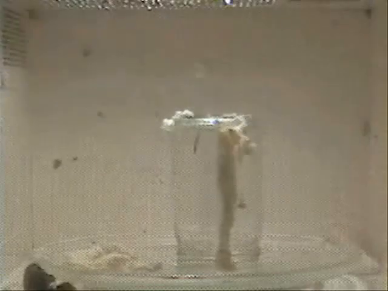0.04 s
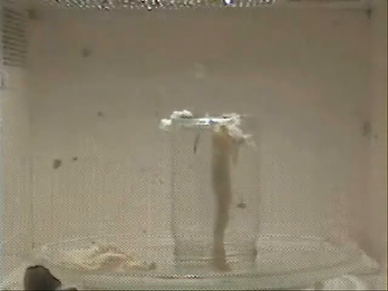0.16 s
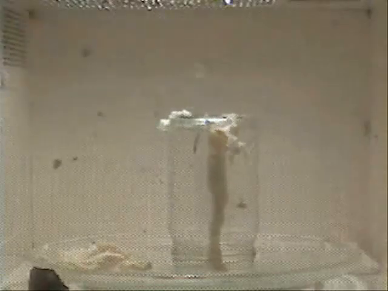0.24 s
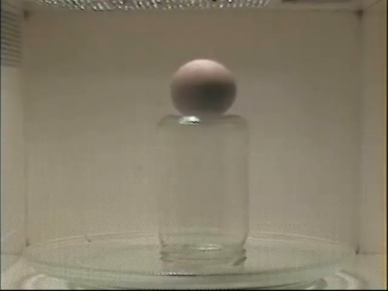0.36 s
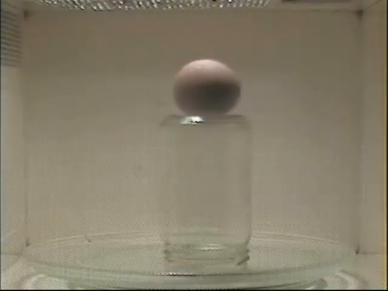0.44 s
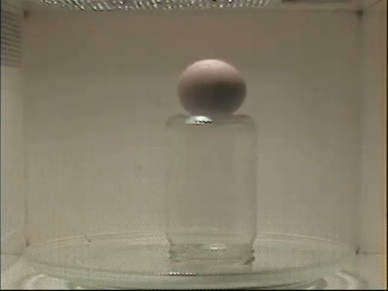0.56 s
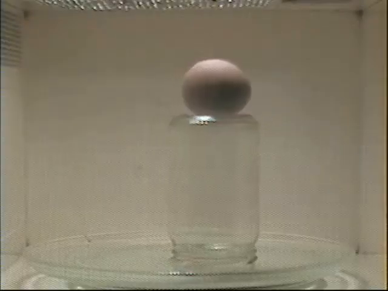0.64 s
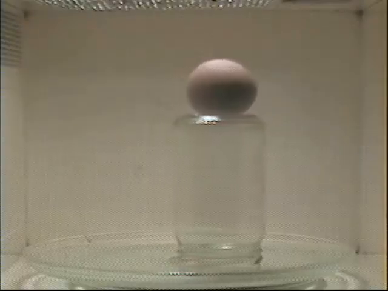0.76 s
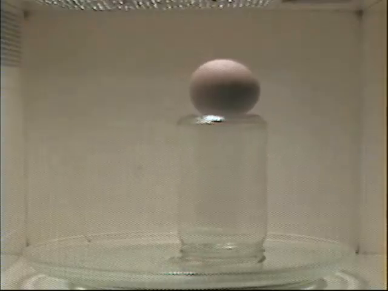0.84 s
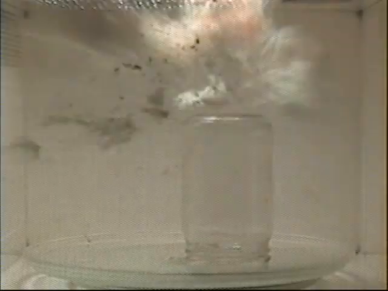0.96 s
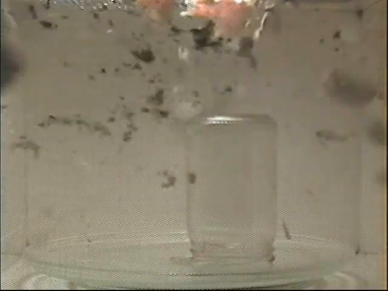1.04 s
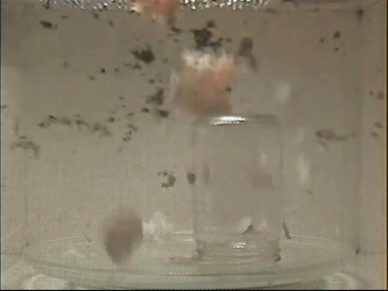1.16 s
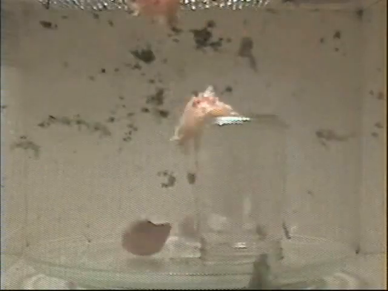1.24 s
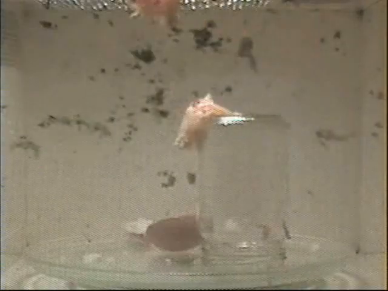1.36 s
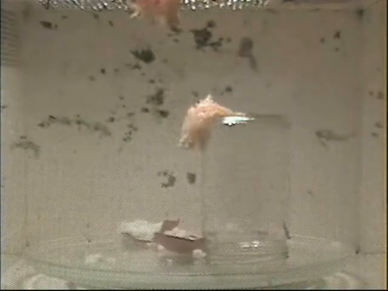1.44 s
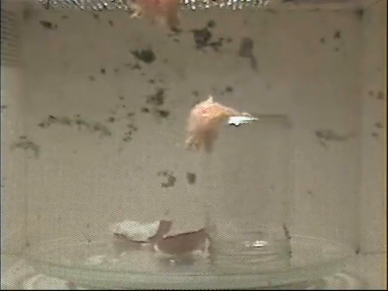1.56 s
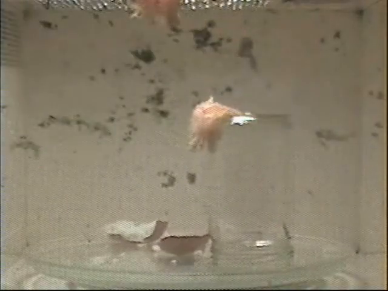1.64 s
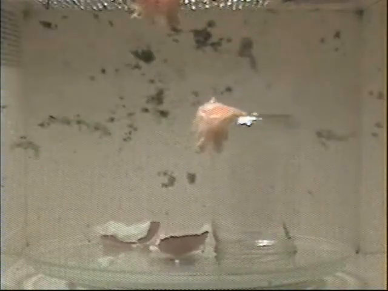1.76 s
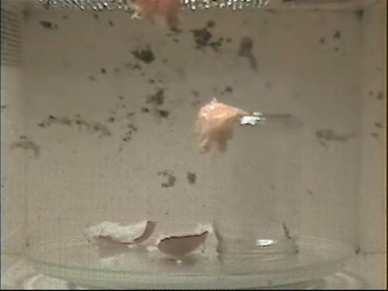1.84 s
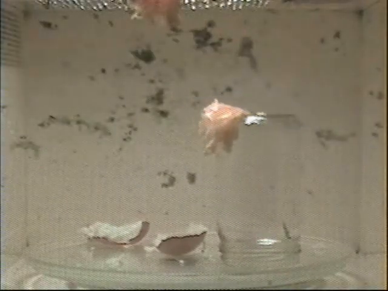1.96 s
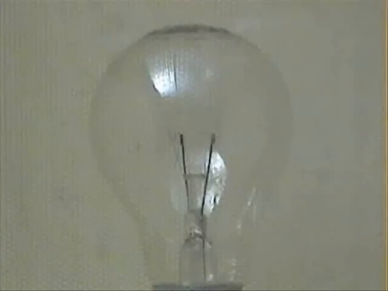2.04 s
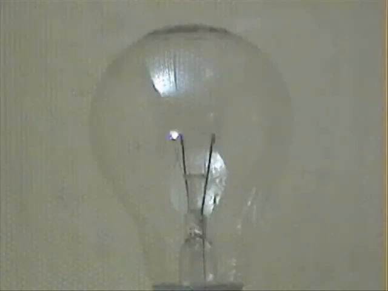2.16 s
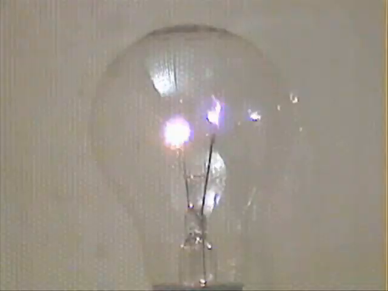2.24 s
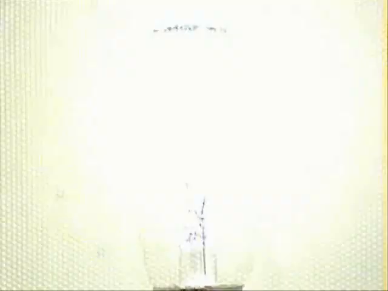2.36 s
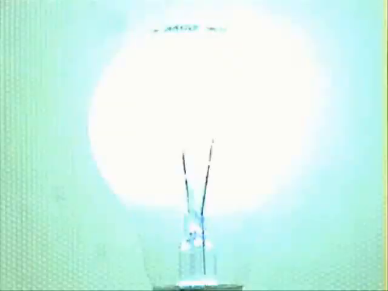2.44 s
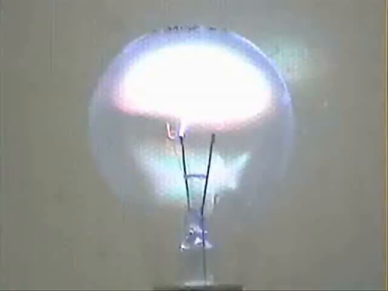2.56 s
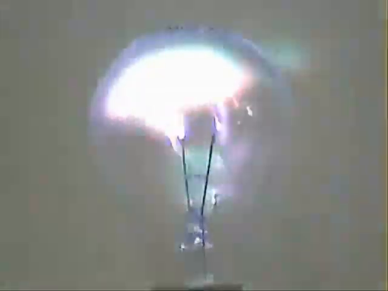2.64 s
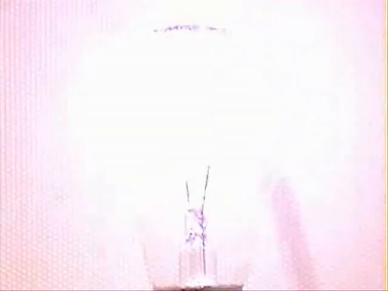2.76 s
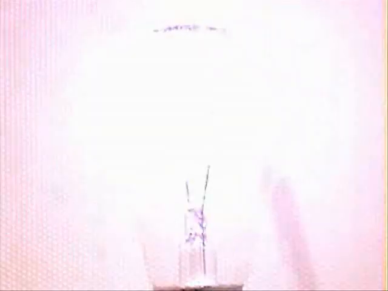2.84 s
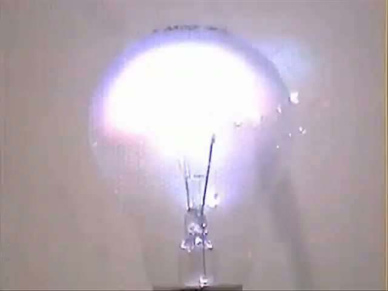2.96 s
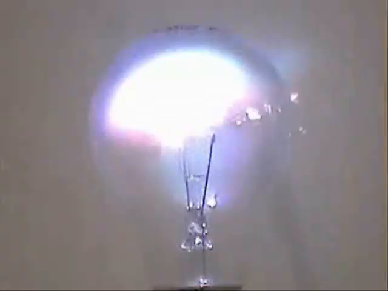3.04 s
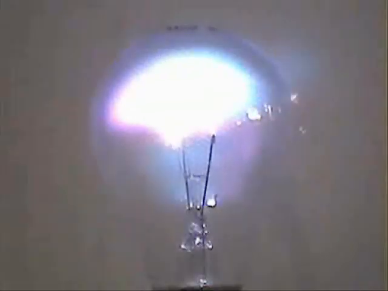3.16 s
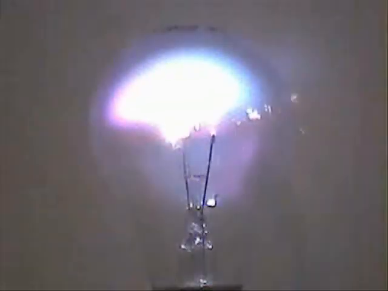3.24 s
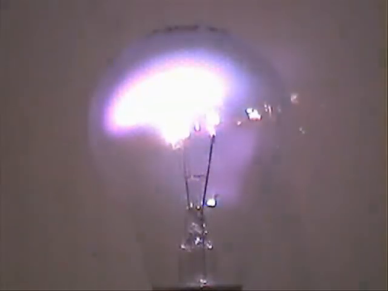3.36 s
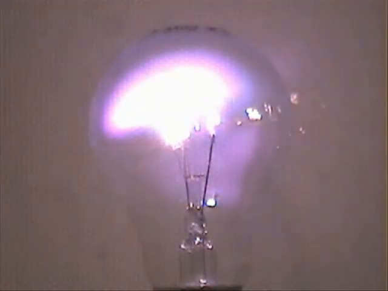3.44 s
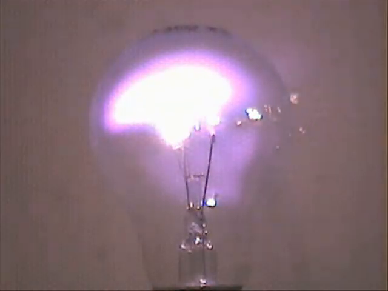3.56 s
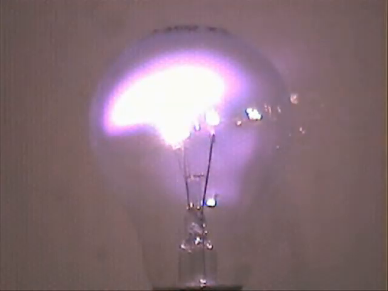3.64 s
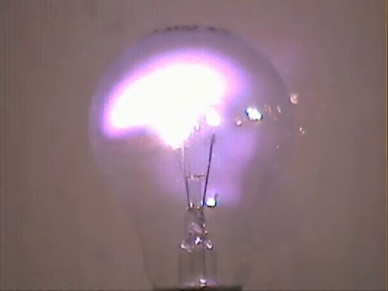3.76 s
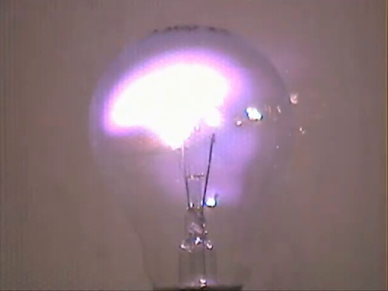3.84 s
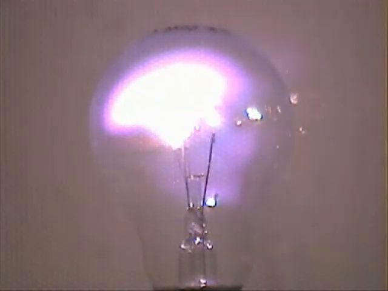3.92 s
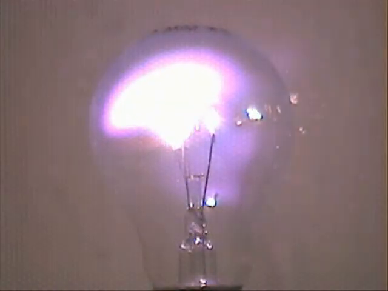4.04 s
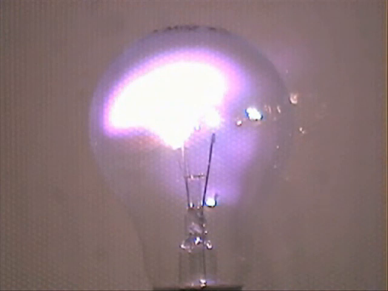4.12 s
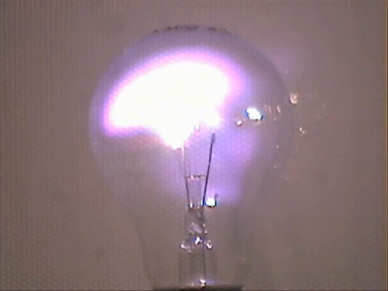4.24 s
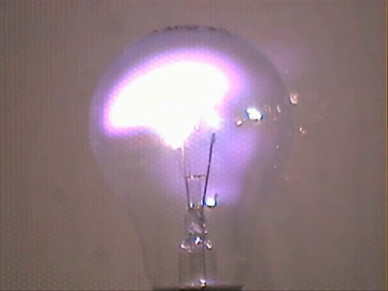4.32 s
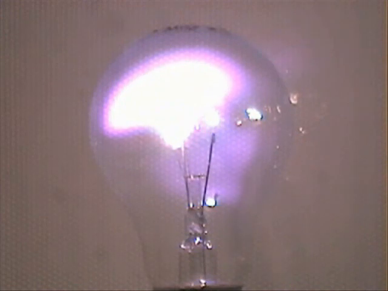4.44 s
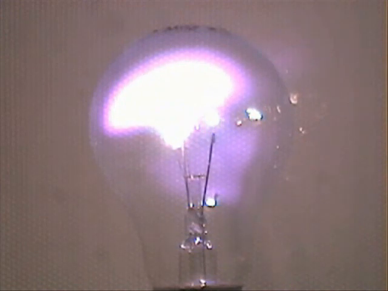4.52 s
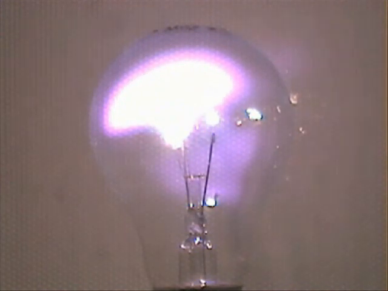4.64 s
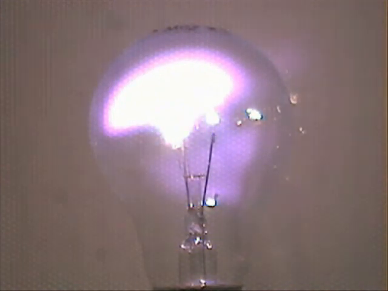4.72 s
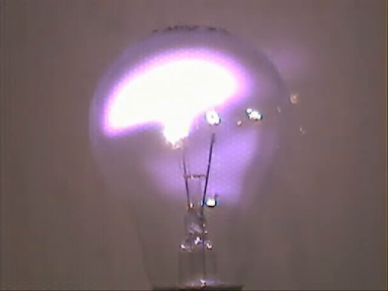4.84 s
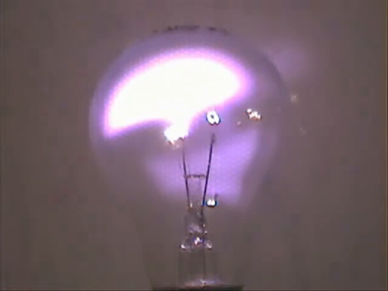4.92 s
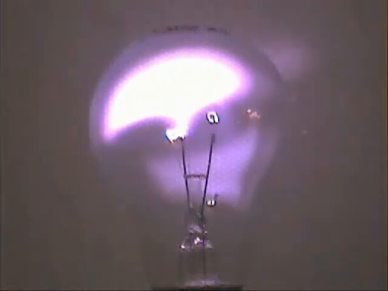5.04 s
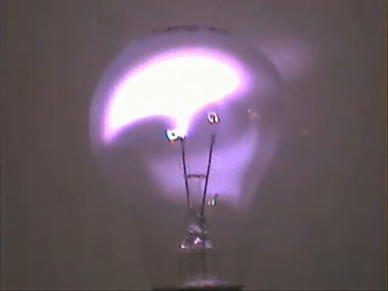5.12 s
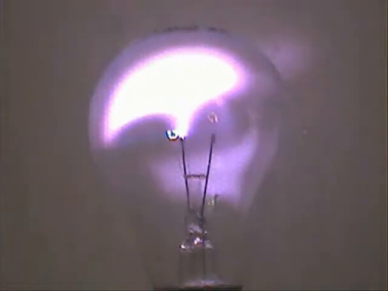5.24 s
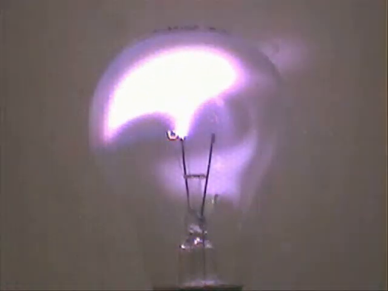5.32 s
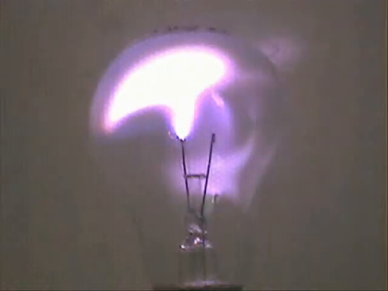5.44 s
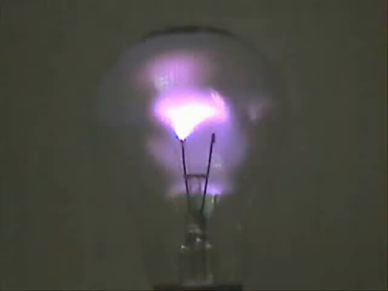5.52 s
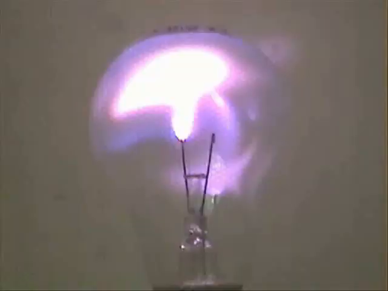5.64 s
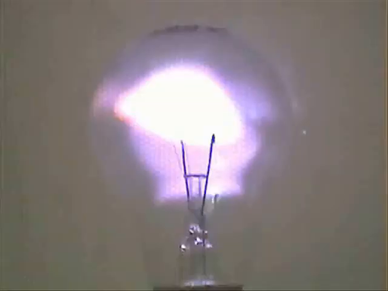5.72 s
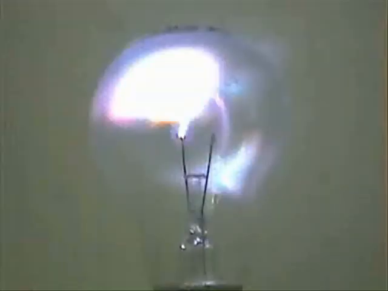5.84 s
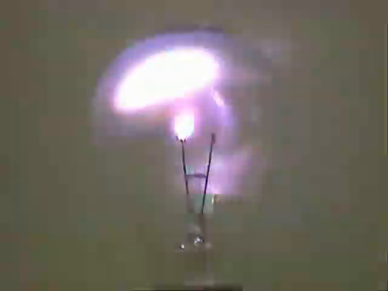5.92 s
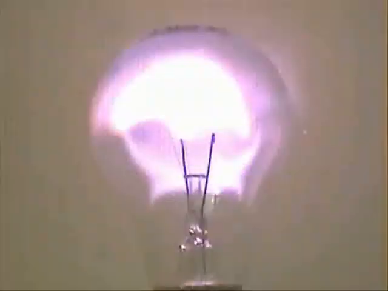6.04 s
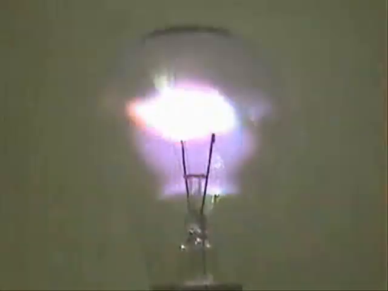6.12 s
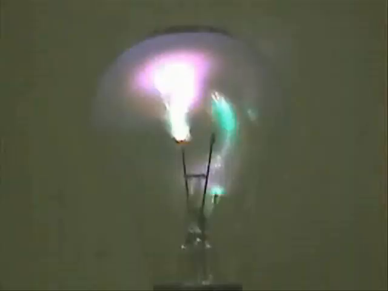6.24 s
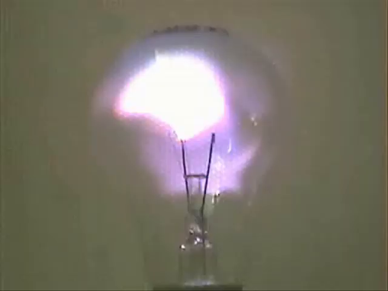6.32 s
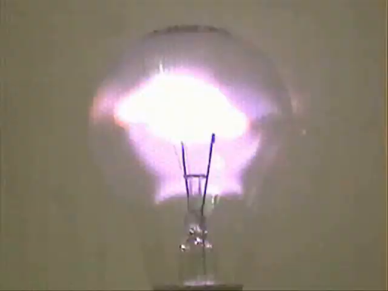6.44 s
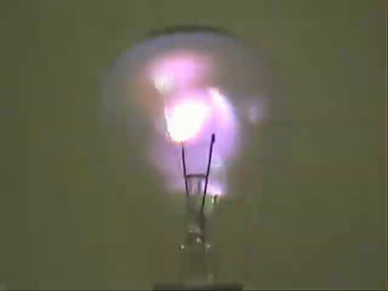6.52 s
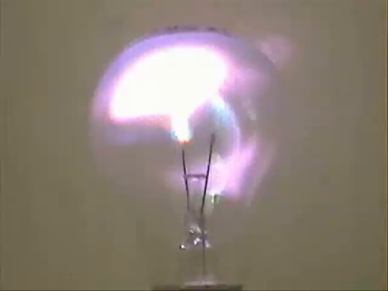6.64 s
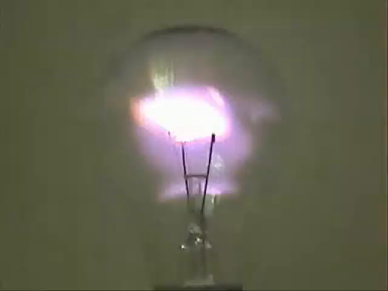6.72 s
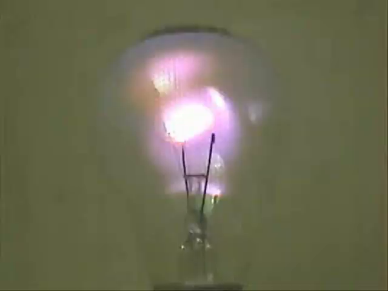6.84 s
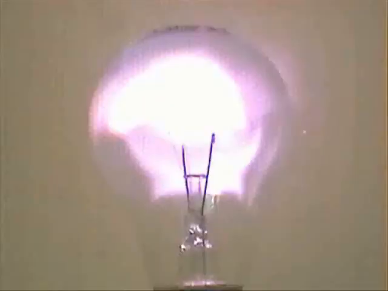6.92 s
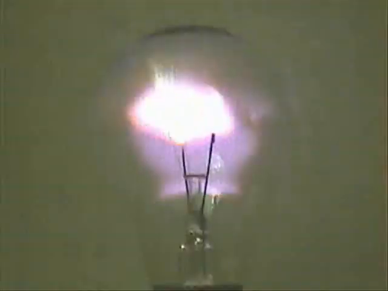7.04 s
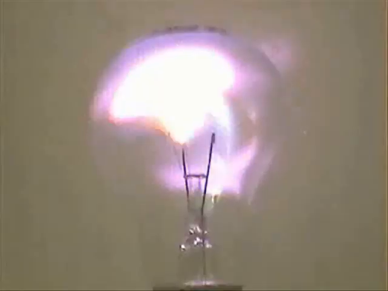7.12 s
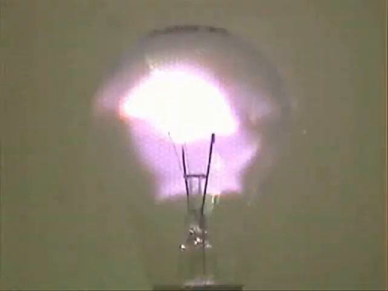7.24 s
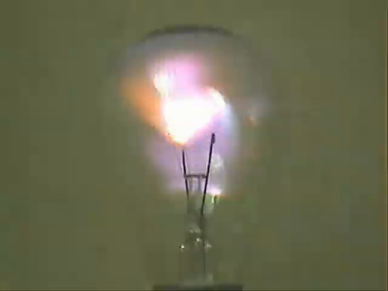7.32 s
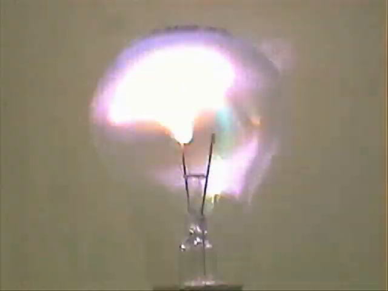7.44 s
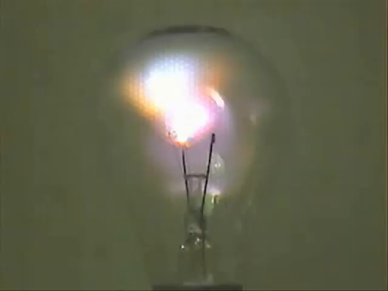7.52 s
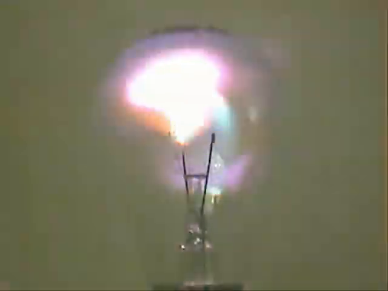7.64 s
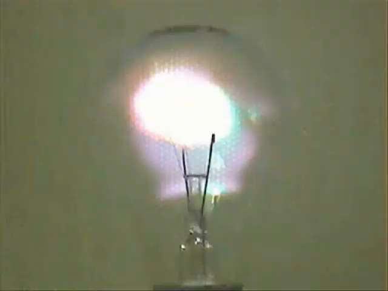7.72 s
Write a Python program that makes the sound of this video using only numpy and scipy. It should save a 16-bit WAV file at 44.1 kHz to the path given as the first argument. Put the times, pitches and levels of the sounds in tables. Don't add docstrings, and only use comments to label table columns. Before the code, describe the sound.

Wet egg spatter and hiss, a near-silent wait, a violent egg burst with shell clinks, then a steady microwave hum with faint fizzing arc tones.

```python
import sys
import numpy as np
from scipy import signal
from scipy.fft import rfft, irfft, next_fast_len
from scipy.io import wavfile
from scipy.ndimage import uniform_filter1d

SR = 44100
rng = np.random.default_rng(int(sys.argv[2]) if len(sys.argv) > 2 else 0)


def ratio(d):
    e = np.asarray(d, float) / 20
    return 10 ** e


def log_audio(samples):
    frames = np.atleast_2d(samples).T
    limited = np.clip(frames, -1, 1)
    pcm = np.round(limited * 32767).astype(np.int16)
    wavfile.write(sys.argv[1], SR, pcm)


N = 343098
T = np.arange(N) / SR

# start in seconds, stop in seconds, level left in the gap after it in dB.
MOMENTS = [
    (0, .4022, -86),
    (.4400, 2.1080, -92),
    (2.1602, 8, -92),
]
FIRST_STOP_S, CLOSE_UP_S = MOMENTS[0][1], MOMENTS[2][0]

# frequency in Hz, level in dB per Hz.
HISS = [(20, -12), (50, -2.5), (140, -3), (250, -6), (700, -11.5), (2000, -14), (5000, -19), (10000, -17.5),
        (15000, -20)]
HISS_DB = -61.5
# frequency in Hz, level in dB.
FAR_HUM = [(48.4, -75.5), (145.3, -72), (183.0, -77), (360.7, -74.5), (532.9, -84.5), (716.0, -79)]

# peak in seconds, rise in seconds, 60 dB decay in seconds, hiss in dB,
# splash in dB over the hiss.
GUSHES = [
    (.086, .3, 0.52, -41, 6),
    (.24, .05, 0.54, -47, -1),
    (.36, 1.1, 2.3, -53.5, -4),
    (1.128, .046, 0.1, -23.5, -5),
    (1.151, .02, 0.41, -32, 2.5),
    (1.312, .22, 0.89, -47, -0.3),
]
RISE_DB, SPLASH_RISE, SPLASH_FALL = 20, 1.6, 1.13
# peak in seconds, rise in seconds, 60 dB decay in seconds,
# level in dB, frequency in Hz.
BOOMS = [
    (.046, .05, .8, -39.5, 120),
    (.06, .016, 0.096, -29.5, 310),
    (.3, 1.1, 2.6, -55, 300),
    (1.135, .012, .12, -23.5, 255),
    (1.165, .03, 0.52, -36.5, 240),
    (1.155, .03, 0.49, -36.5, 720),
    (1.375, .05, .18, -49, 135),
    (1.402, 0.0066, 0.094, -39, 45.4),
]
DRONE_HZ, DRONE_DB = 102, -51.5

# start in seconds, level in dB, dull part in dB over it, bright centre in Hz.
YOLK = [(0.0034, -31.5, -5, 7400), (0.0368, -28.5, -19, 11600), (0.0452, -32, -4, 6600),
        (0.0676, -32, 3.5, 9200), (0.076, -26.5, -14, 9400), (0.0994, -35, 4.5, 5270),
        (0.124, -39, 1, 4990), (0.197, -42, 7.5, 5230), (0.2124, -38, -10, 6970),
        (0.2362, -20.5, -12, 7340), (0.334, -43, -1, 8940), (0.3476, -37, -15, 7560),
        (0.36, -42, -11, 8690)]
# start in seconds, level in dB, dull part in dB over it,
# bright centre in Hz.
SHELL = [(0.93, -47, -12, 14000), (1.089, -42, 2, 8970), (1.1271, -16, -0.5, 9500),
         (1.1314, -23, -10, 5470), (1.1481, -22, -8, 4670), (1.1794, -26.5, -8, 7500),
         (1.2084, -36, -3, 4610), (1.2438, -49, 6, 5850), (1.294, -50, -19, 10000),
         (1.3263, -40, -3, 11100), (1.3444, -42, 3, 9510), (1.4516, -34.5, -23, 10600),
         (1.483, -45, -20, 12900), (1.5235, -48, -6.5, 7870), (1.5364, -54, -8, 9690),
         (1.5953, -57, -9, 7320), (1.7769, -59, -8.5, 10800), (1.8463, -48, -15, 9060),
         (1.95, -57, -10, 8850)]
TICK_RISE_S, YOLK_T60_S, SHELL_T60_S = .001, 0.047, 0.074

# start in seconds, peak in dB, contact in seconds, decay time factor.
BLOWS = [
    (.048, -33, 0.00045, 1.0),
    (0.2367, -15.5, 0.00023, 0.71),
    (.932, -48.5, 0.00017, 0.58),
    (1.121, -19, 0.00038, 0.8),
    (1.1252, -9, 0.00029, 0.9),
    (1.3990, -17, 0.00027, 0.23),
    (1.524, -41, 0.00041, 0.18),
]
# frequency in Hz, level in dB, 60 dB decay in seconds.
WALLS = [(75, -8.5, 0.041), (136, -10, 0.23), (180, -10.5, 0.11), (255, -2.5, 0.11), (286.6, -6.5, 0.16),
         (393, -14, 0.038), (517, -8.5, 0.05), (637, -5, 0.067), (690, 10.5, 0.033), (748, -6.5, 0.23),
         (1090, -3.5, .04), (2490, -10, .015)]
# start in seconds, level in dB.
CLINKS = [
    (.944, -58),
    (1.297, -46),
    (1.335, -41),
    (1.348, -44),
    (1.396, -44),
    (1.405, -53),
    (1.434, -52),
    (1.481, -47),
    (1.597, -61),
]
# frequency in Hz, level in dB, 60 dB decay in seconds.
GLASS = [(3290, -11.5, 0.12), (3950, -6, 0.065), (5150, -12, .06), (6370, -21, .1), (7370, -1, 0.05),
         (8360, -8, .07), (9510, -6, 0.11), (10600, -2, .03), (11900, -12, .08), (12600, -9, .06)]
# time in seconds, peak in dB, width in seconds.
POP = (1.1248, .5, .00009)

# time in seconds, frequency in Hz.
BLADE_HZ = [(2.16, 179.55), (4.5, 179.72), (6, 179.88), (7.8, 179.95)]
# multiple, level in dB.
BLADES = [(1, -33), (2, -32), (3, -56.5), (4, -58.5)]
MAINS_HZ = 100.07
# multiple of MAINS_HZ, level in dB.
CORE = [(2, -35.5), (3, -34)]
# time in seconds, level in dB.
LOAD = [(2.16, -16), (2.45, -16), (2.6, 0)]
# frequency in Hz, level in dB per Hz.
AIR = [(20, -33), (60, -27.5), (120, -25), (200, -20), (400, -18.5), (650, -32), (1300, -34.5), (2200, -43),
       (3500, -41.5), (4500, -47), (6000, -51.5), (8000, -57.5), (11000, -62.5), (15000, -70)]
AIR_DB = -31
# frequency in Hz, width in Hz, level in dB over the air.
CABINET = [(137.6, 28, 4.1), (186.7, 34, 12.3), (239.8, 34.4, 11.3), (289.2, 32, 15.6), (332.3, 17, 12),
           (368.3, 37, 9.3), (426, 35.6, 4), (505.5, 11, 5), (552, 30, 5.1), (581, 58, 3.5), (706, 52, 2.3),
           (810, 45, 3), (1113, 77, 5.5), (1510, 270, 4.2), (1722.6, 185, 21.1), (2493, 200, 6.1),
           (2870, 410, 2.3), (3323, 38, 6), (3826, 120, 6.4), (4148, 130, 10.2), (4950, 330, 5),
           (5535, 250, 8.3), (6440, 200, 5.8), (7780, 190, 1.3)]

# frequency in Hz, width in Hz, level in dB, 1 if only a wild arc rings it.
BULB = [(2880, 110, 2, 0), (8810, 260, -9, 0), (13850, 200, -21.5, 0), (2650, 120, -10, 1),
        (3880, 110, -6, 1), (4520, 130, -9, 1), (5350, 120, -9, 1), (6500, 300, -17, 1),
        (8200, 400, -18, 1), (9600, 250, -15, 1), (11400, 250, -19, 1), (12100, 300, -19, 1),
        (12900, 300, -21, 1), (4500, 3000, -12, 1)]
# peak in seconds, length in seconds, level in dB, heat as a pitch ratio,
# wildness in dB.
FLARES = [
    (2.39, .1, -70, .94, 13),
    (2.595, .08, -48, .95, 1),
    (2.9, .08, -57, 1.1, -14),
    (3.17, .06, -56.5, 1.14, -14),
    (6.05, .13, -52.5, .99, -14),
    (6.25, .08, -62, .99, -14),
    (6.455, .1, -54, .99, -3),
    (6.88, .08, -55.5, 1.0, -14),
    (7.375, .09, -54, 1.0, -7),
    (7.69, .1, -52.5, .99, -4.5),
]
TAME_RISE, WILD_RISE = .4, 1.3
WAVER, HEATING_PER_S = .008, .2
HOT_LOSS_DB = 9
CORE_HZ = 14000
# low edge in Hz, high edge in Hz,
# threshold in dB over the usual level.
THIN_BANDS = [(4450, 4600, -2.2), (5800, 5950, -1.1), (5950, 6100, -1.4), (6800, 6950, -1.7),
              (7150, 7300, -1.3), (7300, 7450, -1.6), (11020, 23000, 12.5)]


def colour(hz, points):
    p = np.array(points)
    return ratio(np.interp(np.log(hz + 1), np.log(p[:, 0]), p[:, 1]))


def hump(hz, centre_hz, width_hz):
    return 1 / (1 + (2 * (hz - centre_hz) / width_hz) ** 2) ** 2


def low_cut(hz, corner_hz):
    return (1 + (corner_hz / (hz + 1)) ** 6) ** -.5


def noise(shape, n=N):
    m = next_fast_len(n)
    spectrum = rfft(rng.standard_normal(m)) * shape(np.fft.rfftfreq(m, 1 / SR))
    x = irfft(spectrum, m)[:n]
    return x / x.std()


def walk(rate):
    k = int(SR / rate)
    steps = np.repeat(rng.standard_normal(N // k + 1), k)
    return 0.74 * uniform_filter1d(uniform_filter1d(steps, k), k)[:N]


def tone(hz, db, wobble_db):
    turns = np.cumsum(hz + 0 * T) / SR + rng.random()
    return np.sqrt(2) * ratio(db + wobble_db * walk(5.6)) * np.sin(2 * np.pi * turns)


def add(out, s, x):
    i = int(s * SR)
    out[i:i + len(x)] += x[:N - i]


def surge(t, s, rise, t60, rise_steep=1, fall_steep=1):
    climb = rise_steep * RISE_DB * (t - s) / rise
    decay = -60 * fall_steep * (t - s) / t60
    other_moment = (t < FIRST_STOP_S) != (s < FIRST_STOP_S)
    return np.where((t < s - rise) | other_moment, -200, np.where(t < s, climb, decay))


def waiting():
    hiss = ratio(HISS_DB) * noise(lambda hz: colour(hz, HISS))
    return hiss + sum(tone(hz, db, 2.9) for hz, db in FAR_HUM)


def dull_splash(hz):
    body = (1 + (hz / 3600) ** 6) ** -.5 * (hz / (hz + 400)) * (1000 + hz) ** -.6
    return body * np.sqrt(1 + 2.5 * hump(hz, 720, 220) + 1.0 * hump(hz, 2300, 700))


def spray():
    t = T[T < CLOSE_UP_S]
    n = len(t)
    bright = noise(lambda hz: low_cut(hz, 4500), n) * ratio(1.9 * walk(150)[:n])
    dull = noise(dull_splash, n) * ratio(2.9 * walk(120)[:n])
    out = tone(DRONE_HZ, DRONE_DB, 2.0) * (T < FIRST_STOP_S)
    for s, rise, t60, db, splash_db in GUSHES:
        out[:n] += ratio(db + surge(t, s, rise, t60)) * bright
        out[:n] += ratio(db + splash_db + surge(t, s, rise, t60, SPLASH_RISE, SPLASH_FALL)) * dull
    for s, rise, t60, db, hz0 in BOOMS:
        boom = noise(lambda hz: np.sqrt(hump(hz, hz0, hz0 / 5) + 0.024 * hump(hz, hz0, 1.6 * hz0)), n)
        out[:n] += ratio(db + surge(t, s, rise, t60)) * boom
    return out


def spatter():
    out, t = np.zeros(N), np.arange(SR // 4) / SR
    for rows, t60 in ((YOLK, YOLK_T60_S), (SHELL, SHELL_T60_S)):
        shape = (1 - np.exp(-t / TICK_RISE_S)) * ratio(-60 * t / t60)
        for s, db, dull_db, hz0 in rows:
            bright = noise(lambda hz: low_cut(hz, 4000) * np.sqrt(0.64 + hump(hz, hz0, 3000)), len(t))
            dull = noise(lambda hz: np.sqrt(hump(hz, 2320, 2800)), len(t))
            add(out, s, ratio(db) * shape * (bright + ratio(dull_db) * dull))
    return out


def blows():
    out, t = np.zeros(N), np.arange(SR // 2) / SR
    chance = rng.standard_normal((len(BLOWS), len(WALLS), 2))
    for (s, db, contact, scale), rows in zip(BLOWS, chance):
        ring = np.zeros(len(t))
        for (f, g, t60), (a, b) in zip(WALLS, rows):
            decay = ratio(g + 2.0 * a - 60 * t / (t60 * scale))
            ring += decay * np.sin(2 * np.pi * f * (1 + 0.017 * b) * t + 1.58)
        push = np.exp(-(t[:200] / contact - 1.5) ** 2)
        ring = np.convolve(ring, push)[:len(t)]
        add(out, s - contact, ratio(db) * ring / np.abs(ring).max())
    return out


def clinks():
    out, t = np.zeros(N), np.arange(SR // 4) / SR
    chance = rng.standard_normal((len(CLINKS), len(GLASS), 2))
    for (s, db), rows in zip(CLINKS, chance):
        for (f, g, t60), (a, b) in zip(GLASS, rows):
            decay = ratio(db + g + 4.7 * a - 60 * t / t60)
            add(out, s, decay * np.sin(2 * np.pi * f * (1 + 0.006 * b) * t))
    return out


def burst():
    s, db, width = POP
    u = (T - s) / width
    spike, echo = np.exp(-u ** 2), .6 * np.exp(-(u - 4.5) ** 2)
    suction = .27 * np.exp(-((u - 10) / 8) ** 2)
    return ratio(db) * (spike + echo - suction)


def fan():
    blade = np.interp(T, *np.transpose(BLADE_HZ))
    return sum(tone(k * blade, db, 1.84) for k, db in BLADES)


def transformer():
    load_db = np.interp(T, *np.transpose(LOAD))
    return sum(tone(k * MAINS_HZ, db + (k - 2) * load_db, 0.86) for k, db in CORE)


def moving_air():
    def shape(hz):
        rings = sum(ratio(2 * db) * hump(hz, f, w) for f, w, db in CABINET)
        return colour(hz, AIR) * np.sqrt(1 + rings)
    return ratio(AIR_DB + 0.086 * walk(7.3)) * noise(shape)


def arc():
    out, t = np.zeros(N), np.arange(-SR // 4, SR // 4) / SR
    chance = rng.standard_normal((len(FLARES), len(BULB), 2))
    for (s, fall, db, heat, wild_db), rows in zip(FLARES, chance):
        rise = fall * (WILD_RISE if wild_db > 0 else TAME_RISE)
        swell = np.where(t < 0, np.exp(-(t / rise) ** 2), np.exp(-(np.abs(t) / fall) ** 1.7))
        waver = WAVER * noise(lambda hz: hz < 25, len(t))
        heating = HEATING_PER_S * ratio(min(wild_db, 2)) * swell.cumsum() / SR
        turns = np.cumsum(heat + waver + heating) / SR
        for (f, w, g, side), (a, b) in zip(BULB, rows):
            flutter = [noise(lambda hz: np.sqrt(hump(hz, 0, w)), len(t)) for _ in range(2)]
            phase = 2 * np.pi * f * (1 + .012 * side * b) * turns
            ring = flutter[0] * np.cos(phase) + flutter[1] * np.sin(phase)
            loss_db = HOT_LOSS_DB * 10 * max(heat - 1, 0) * np.log2(f / BULB[0][0])
            level = ratio(db + g - loss_db + side * (wild_db + 1.5 * a))
            add(out, s - .25, level * swell ** (1 + f / CORE_HZ) * ring)
    return out


def thin_out(x):
    hz, _, z = signal.stft(np.pad(x, (0, 2048), "reflect"), SR, nperseg=1024)
    power = uniform_filter1d(np.abs(z) ** 2, size=3, axis=0)
    slow = uniform_filter1d(power, size=4, axis=1)
    for lo, hi, margin_db in THIN_BANDS:
        band = (hz > lo) & (hz < hi)
        cells = power[band] if margin_db > 0 else slow[band].mean(axis=0, keepdims=True)
        z[band] *= cells > np.median(cells, axis=1, keepdims=True) * ratio(2 * margin_db)
    loud = slow[(hz > 9000) & (hz < 9500)].mean(axis=0)
    z[(hz > 9600) & (hz < 10900)] *= loud < 11 * np.median(loud)
    return signal.istft(z, SR, nperseg=1024)[1][:N]


def scene():
    egg = waiting() + spray() + spatter() + blows() + clinks() + burst()
    bulb = thin_out(fan() + transformer() + moving_air() + arc())
    gate, trace = np.zeros(N), np.zeros(N)
    for start, stop, gap_db in MOMENTS:
        gate += ((T - start) / 0.00069).clip(0, 1) * (T < stop)
        trace += ratio(gap_db - 500 * (T - stop).clip(0, 1)) * (T >= stop)
    sound = gate * np.where(T < CLOSE_UP_S, egg, bulb)
    return (sound + trace * noise(lambda hz: 1 / (hz + 300)))[None]


def band_limit(x):
    return signal.sosfilt(signal.butter(12, 15880, fs=SR, output="sos"), x)


def record(dry):
    rounded = np.tanh(dry * .6) / .6
    top_cut = signal.ellip(10, .2, 80, 14560, fs=SR, output="sos")
    return band_limit(signal.sosfilt(top_cut, rounded))


dry = scene()
out = record(dry)
log_audio(out)
```